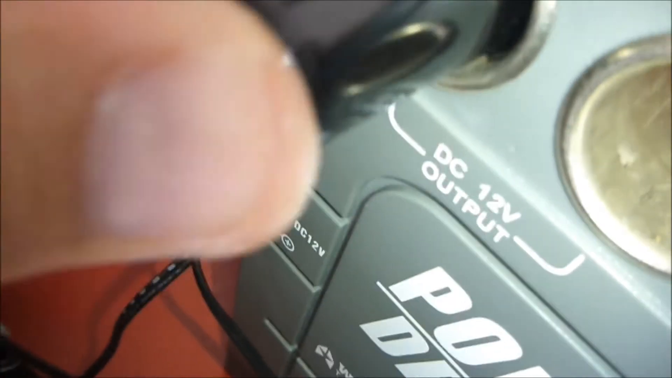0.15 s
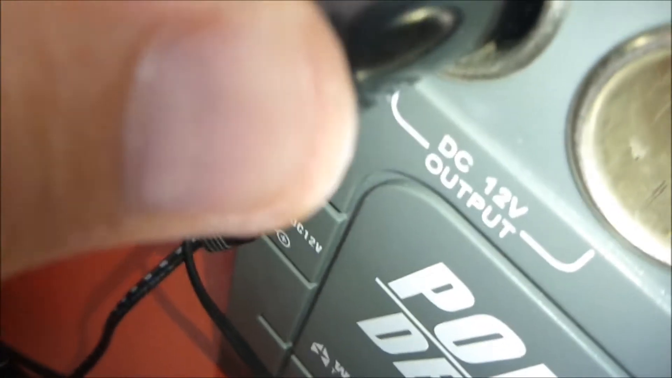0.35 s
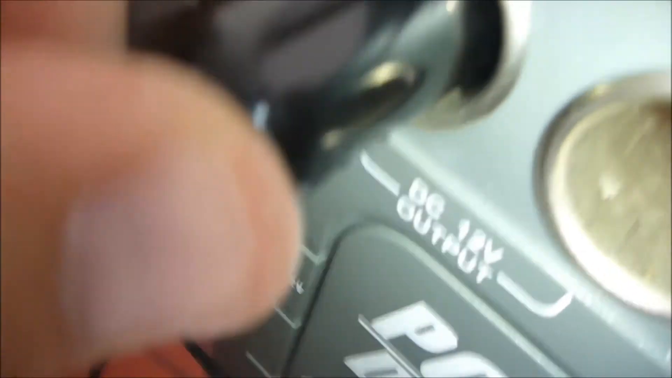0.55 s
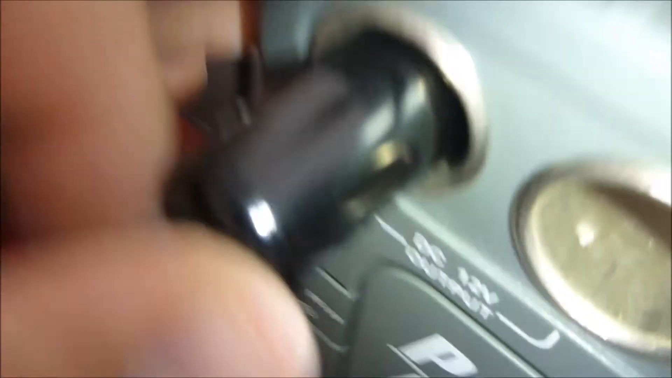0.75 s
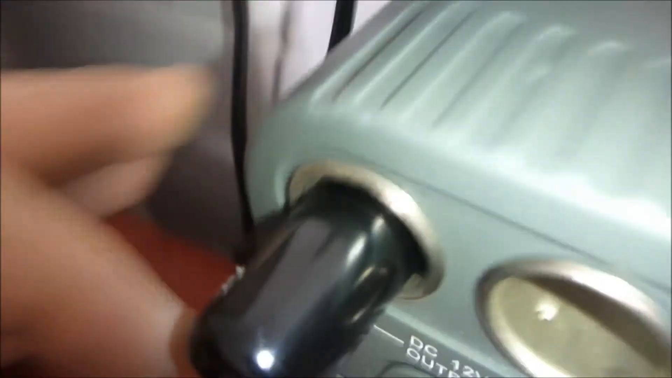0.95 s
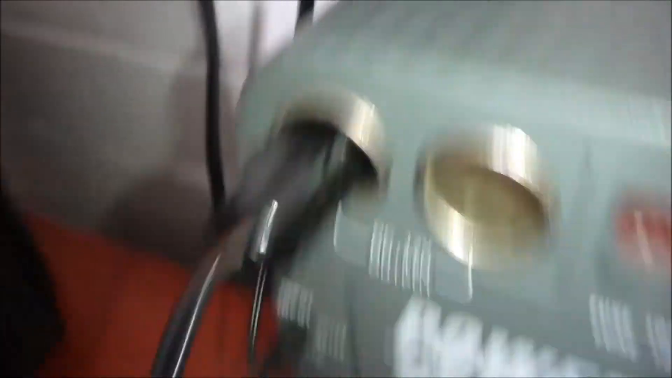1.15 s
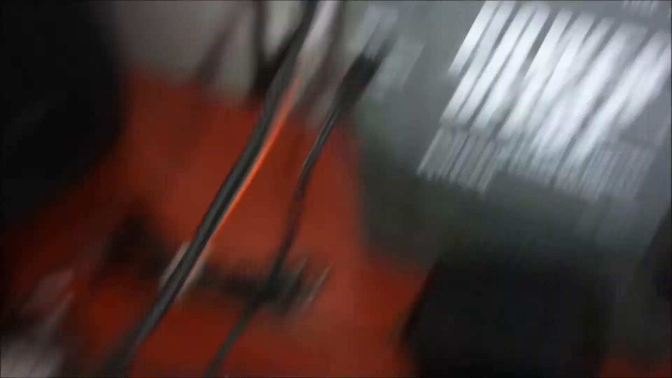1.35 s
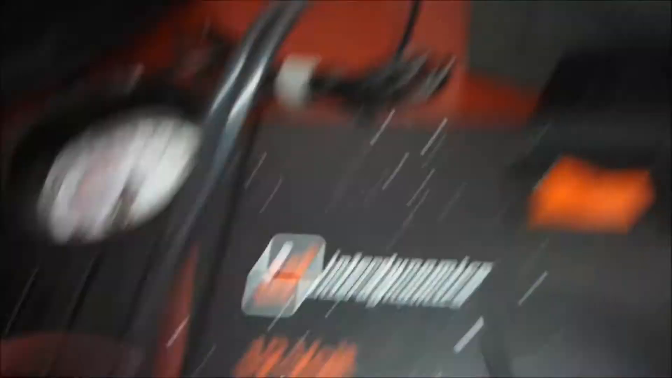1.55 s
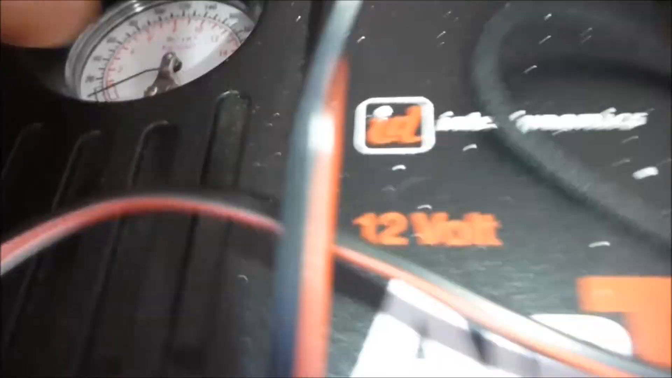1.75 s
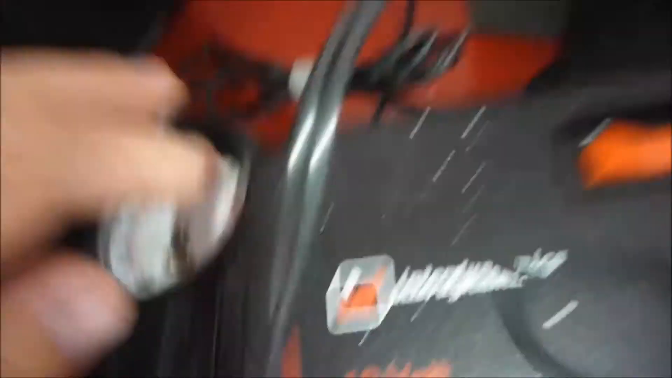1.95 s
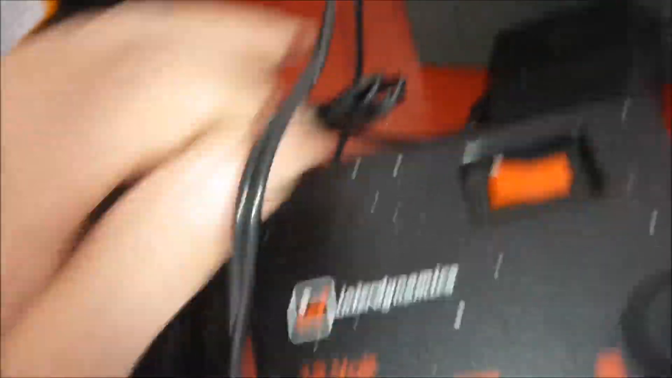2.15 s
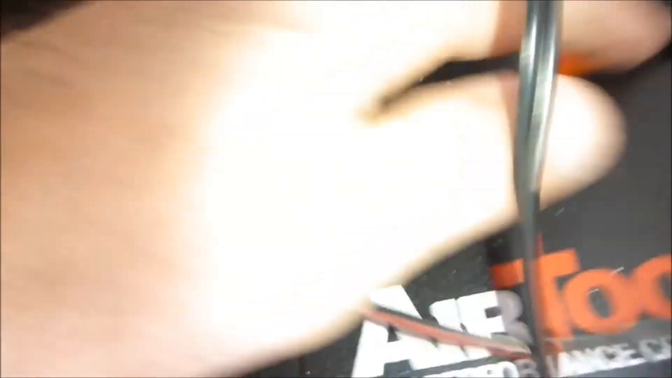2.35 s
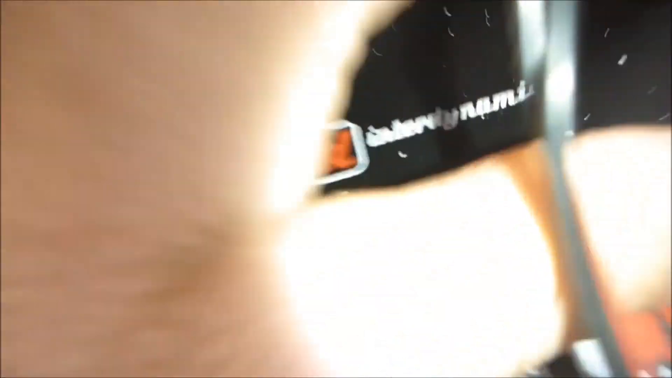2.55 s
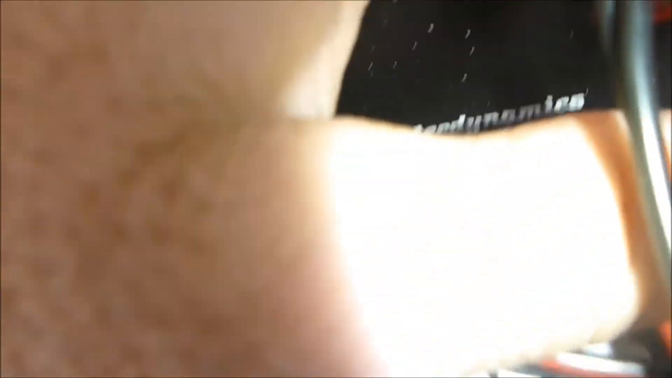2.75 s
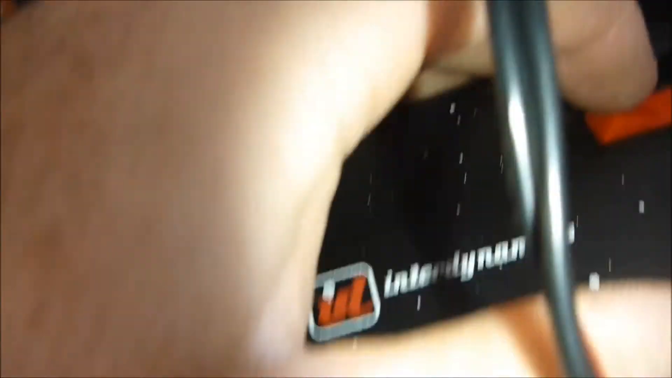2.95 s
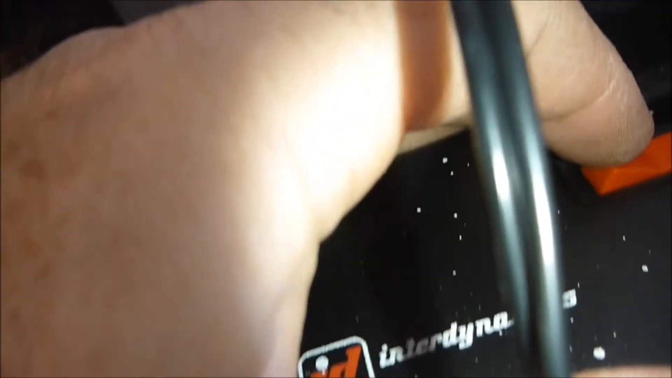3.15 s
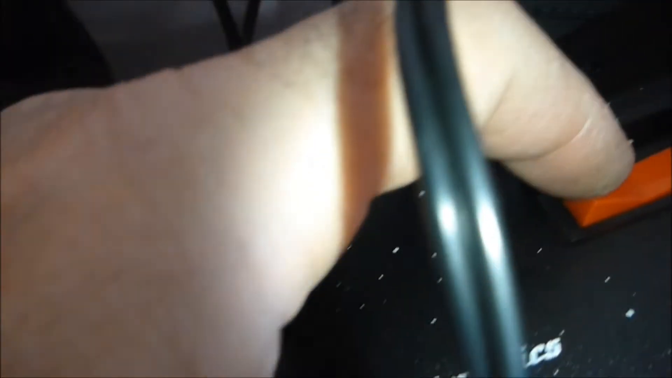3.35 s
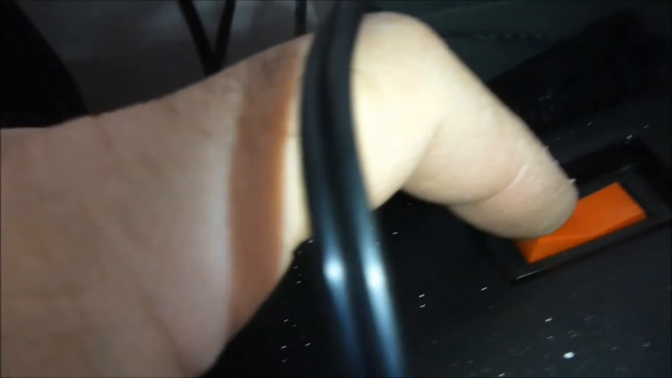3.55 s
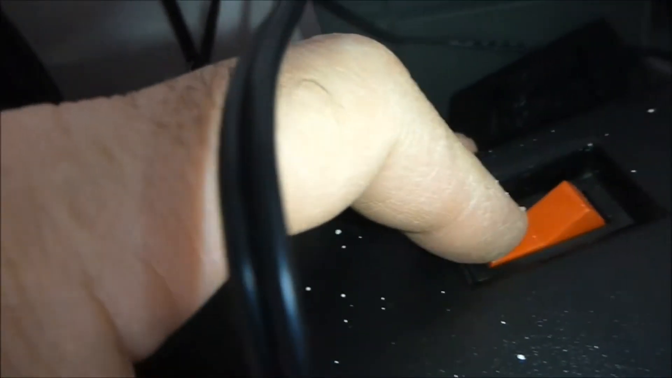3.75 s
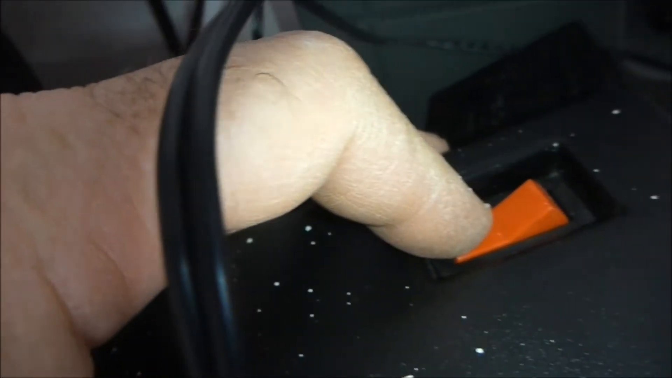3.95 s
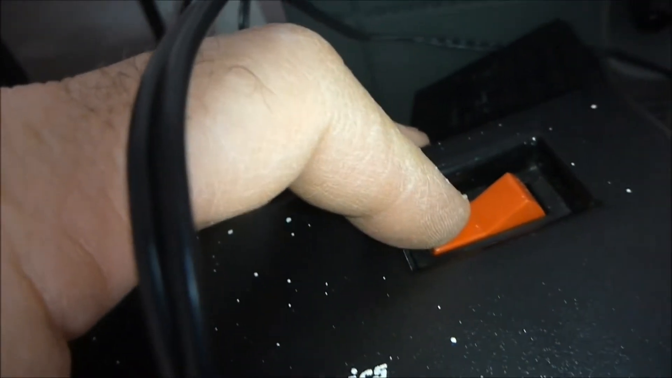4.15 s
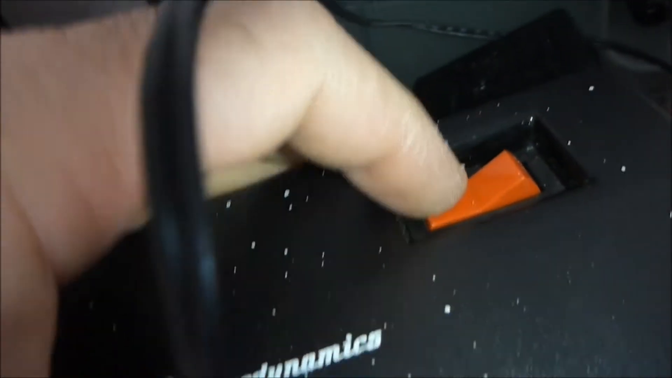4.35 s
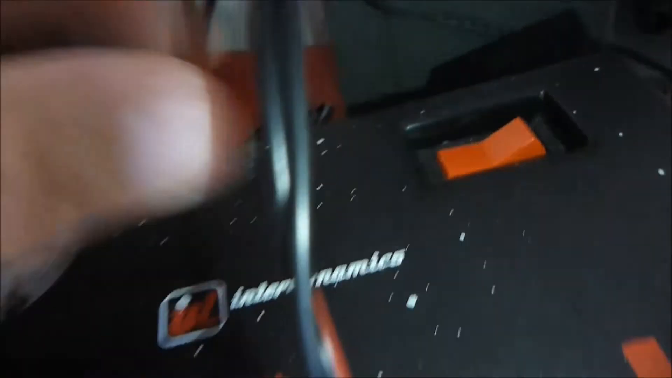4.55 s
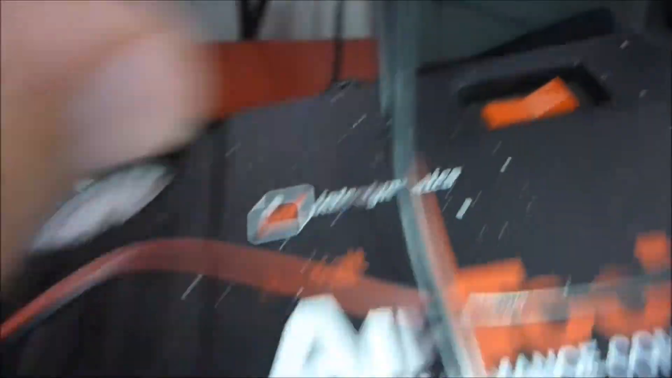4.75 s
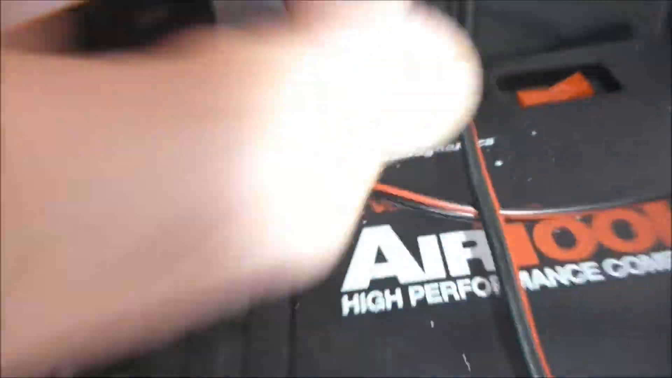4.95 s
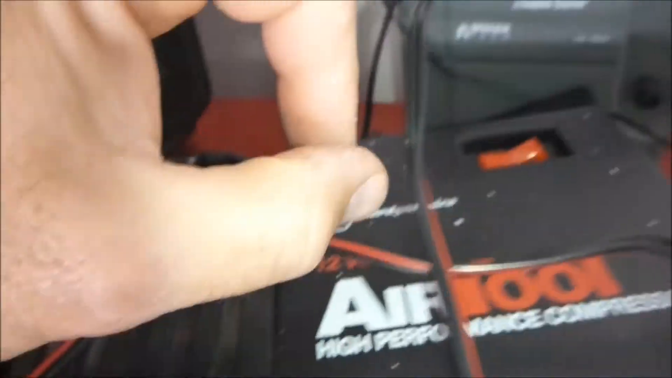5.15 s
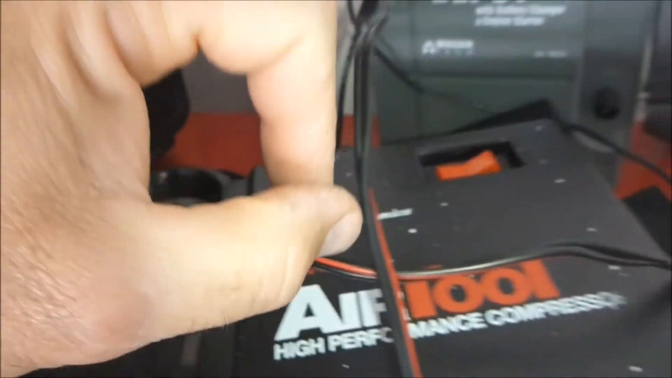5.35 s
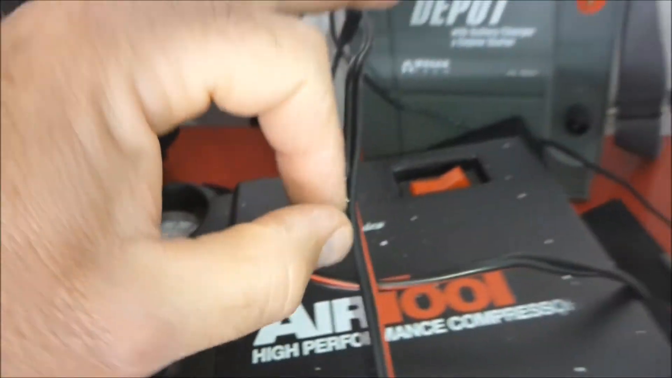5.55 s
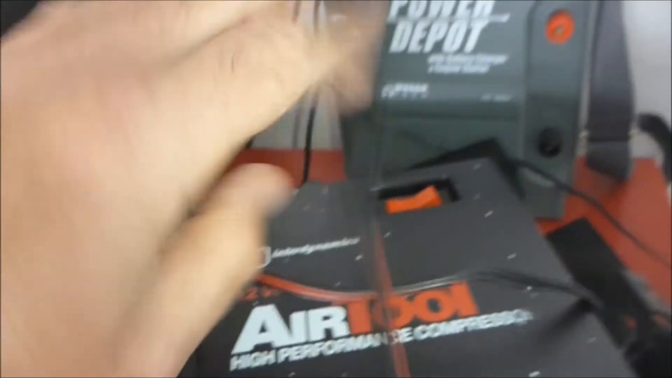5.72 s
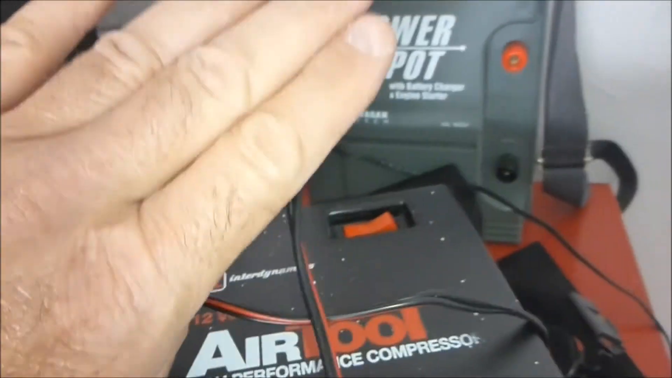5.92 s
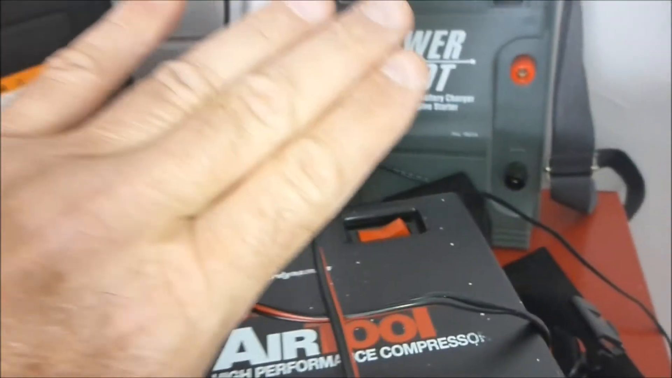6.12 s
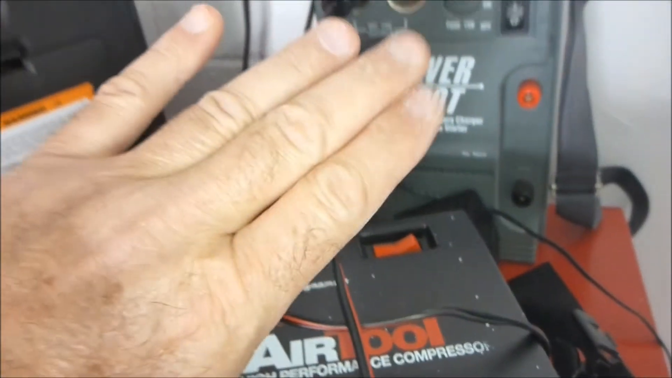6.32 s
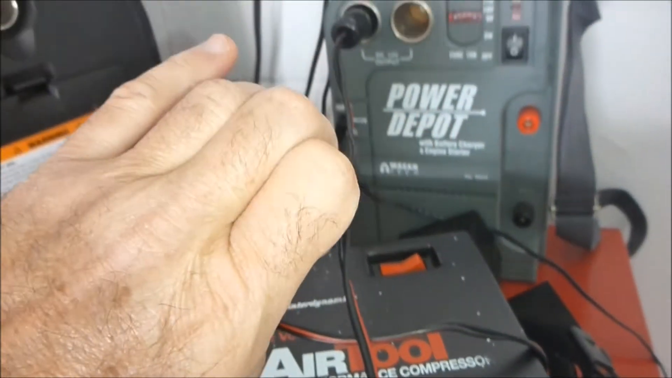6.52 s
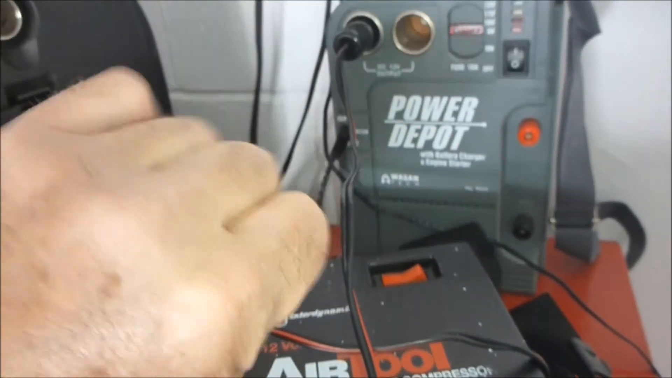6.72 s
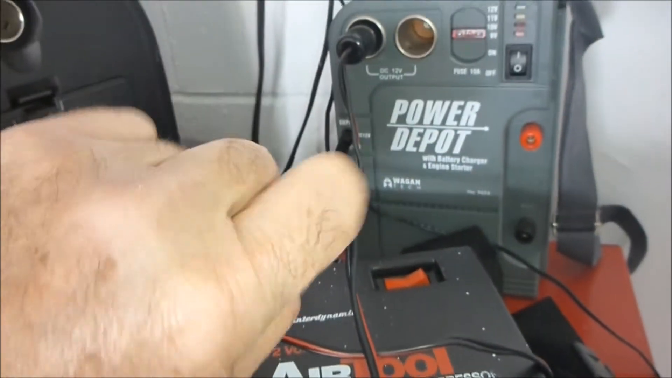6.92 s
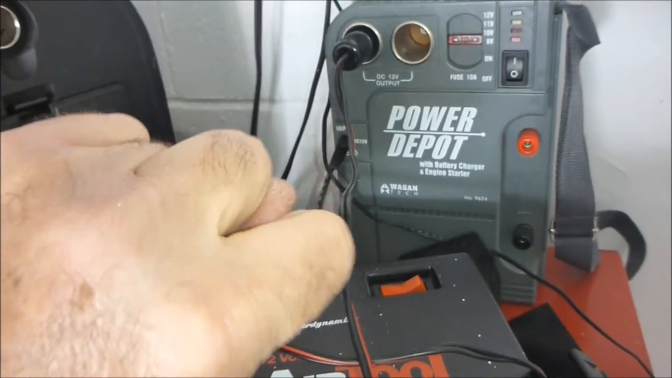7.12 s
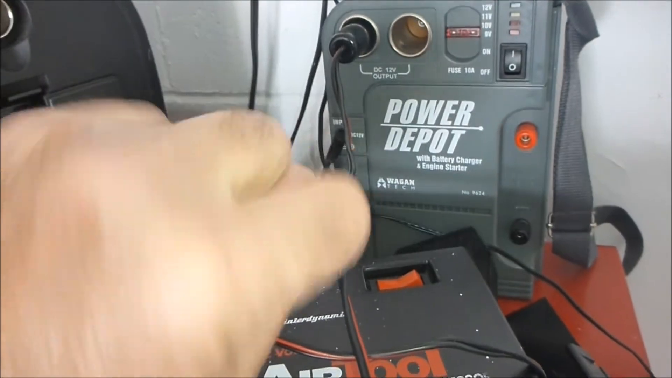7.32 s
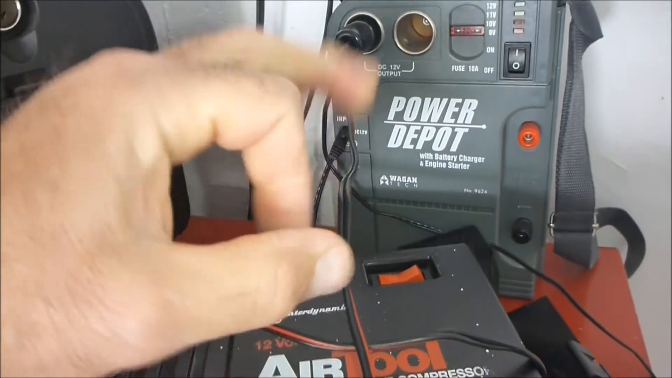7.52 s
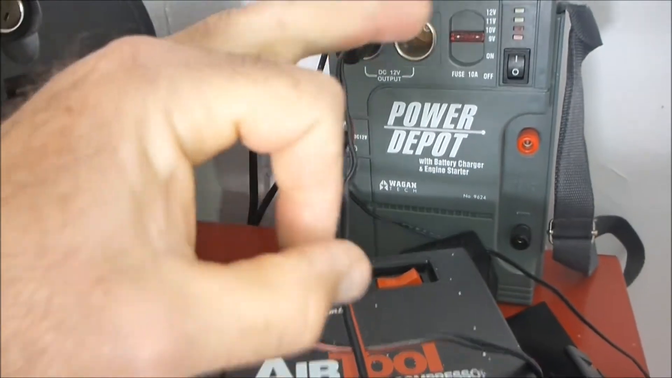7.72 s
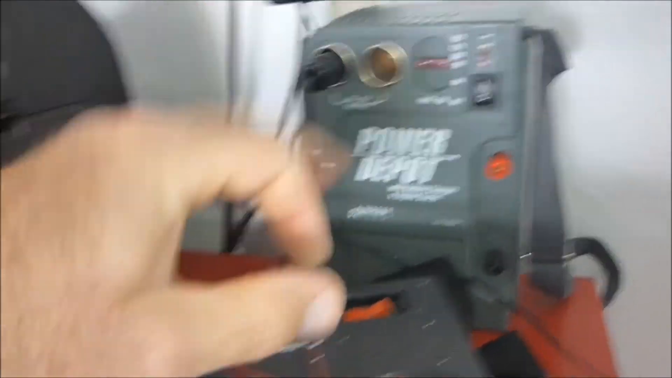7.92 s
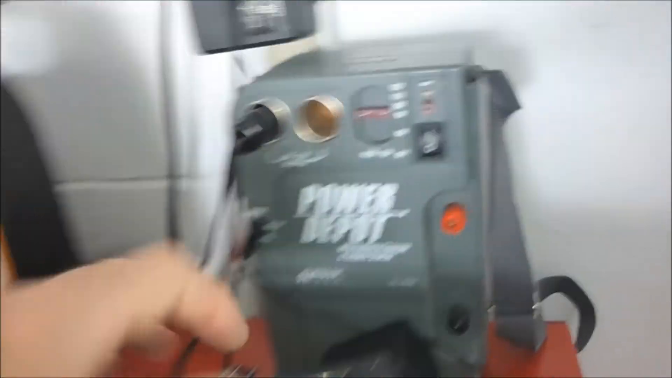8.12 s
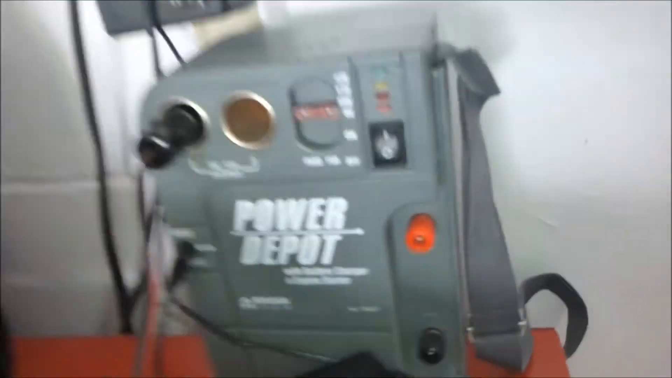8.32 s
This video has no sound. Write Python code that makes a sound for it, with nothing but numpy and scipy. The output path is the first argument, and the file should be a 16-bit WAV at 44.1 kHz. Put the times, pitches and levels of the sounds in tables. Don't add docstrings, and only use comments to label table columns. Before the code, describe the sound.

After quiet handling ticks and a hollow bump, a switch clacks and a little air compressor bursts into rapid chattering squeal with gear whine.

```python
import sys
import numpy as np
from scipy import signal
from scipy.fft import rfft, irfft, next_fast_len
from scipy.io import wavfile

SR = 44100
rng = np.random.default_rng(int(sys.argv[2]) if len(sys.argv) > 2 else 0)


def dump(signal):
    limited = np.clip(np.atleast_2d(signal).T, -1, 1)
    pcm = np.round(limited * 32767).astype(np.int16)
    wavfile.write(sys.argv[1], SR, pcm)


def rack_gain(trim_db):
    fader = np.asarray(trim_db, float)
    return 10 ** (fader / 20)


N = 369558
T = np.arange(N) / SR
FREE_PER_S = 34.548
GEAR = 55 / 12


def evened(x):
    return x / np.sqrt(np.mean(x ** 2) + 1e-20)


def curves(rows, t=T):
    s, *columns = np.transpose(rows)
    return [np.interp(t, s, c) for c in columns]


def add(mix, s, sound):
    part = mix[round(s * SR):][:len(sound)]
    part += sound[:len(part)]


def phase(hz):
    return 2 * np.pi * np.cumsum(hz) / SR


def coloured(x, points):
    hz, db = np.transpose(points)
    size = next_fast_len(len(x))
    log_hz = np.log(np.fft.rfftfreq(size, 1 / SR) + 1)
    gain = rack_gain(np.interp(log_hz, np.log(hz + 1), db))
    return evened(irfft(rfft(x, size) * gain, size)[:len(x)])


def ring(x, modes):
    total = 0
    for hz, width, db in modes:
        total = total + rack_gain(db) * signal.lfilter(*signal.iirpeak(hz, hz / width, SR), x)
    return evened(total)


def wander(hz):
    return evened(signal.lfilter(*signal.butter(2, hz, fs=SR), rng.standard_normal(N)))


def gate(share, start, rise, fall, rest_db):
    u = (share - start) % 1
    return evened(rack_gain(rest_db) + (1 - np.exp(-u / rise)) * np.exp(-(u / fall) ** 2))


def compressor():
    turns = crank()
    share = turns % 1
    slow = np.clip(1 - np.gradient(turns) * SR / FREE_PER_S, 0, 1) ** .5
    first_db, hz, second_db, case_db, air_db, high_db = running(turns)
    squeal, shrill = seal(turns, hz, second_db)
    shake = shaking(share)
    puff = valves(share, slow)
    thick_walls = signal.butter(6, 6300, fs=SR, output="sos")
    case = signal.sosfilt(thick_walls, rattle(shake, share))
    air = signal.sosfilt(thick_walls, outlet_air(shake, turns) * puff)

    out = rack_gain(first_db) * pipe(squeal) + rack_gain(high_db) * leak(shrill, share, slow)
    out += head_cover(shake, puff)
    out *= np.clip((T - 3.77) / 0.023, 0, 1)
    slow_case_db = -4 * slow
    start = np.clip((T - 3.765) / 0.062, 0, 1)
    out += (rack_gain(case_db + slow_case_db) * case + rack_gain(air_db) * air) * start
    out += catches() + slips()
    small_case = signal.butter(4, 410, "high", fs=SR, output="sos")
    return signal.sosfilt(small_case, out) + rotor(turns)


def crank():
    switch_on_s, first_stroke_s, first_turn = 3.7, 3.781, .0193
    short_per_s, wind_up_s, sag_per_s2 = 24.484, .29866, .13964
    t = np.maximum(T, switch_on_s) - first_stroke_s
    lag = short_per_s * wind_up_s * (1 - np.exp(-t / wind_up_s))
    return first_turn + FREE_PER_S * t - lag - sag_per_s2 * t ** 2 / 2


def running(turns):
    # t/s, first slip level/dB, second slip level/dB against it
    grip_curve = [(3.76, -30, -9), (3.945, -29.5, -25), (3.958, -10, -27), (4.02, -14, -12),
                  (4.1, -14, -29.5), (4.3, -15, -25), (4.4, -16.5, -9), (4.72, -16.5, -13), (5.4, -20.5, 0),
                  (5.9, -19.5, -1.5), (6.5, -23.5, 5.5), (7.1, -22.5, 0.5), (7.6, -22.5, 1),
                  (8.0, -23, 1.5), (8.12, -20.5, -1), (8.18, -18.5, -2), (8.38, -14.5, -3)]
    first_db, second_db = curves(grip_curve)
    since = np.maximum(T - 3.76, 0)
    lurch = np.exp(-((T - 3.835) / 0.018) ** 2)
    speed = np.clip(np.gradient(turns) * SR / FREE_PER_S, .05, 1)

    squeal_hz, cold_hz, settle_hz, settle_s = 964.4, 74.4, 59.2, 0.29
    hz = squeal_hz + cold_hz * (1 - np.tanh((T - 4.06) / 0.008)) / 2
    hz += settle_hz * np.exp(-since / settle_s)
    hz += 0.5 * np.maximum(second_db, 0)

    case_db = -24 - 0.27 * since + 2.5 * lurch
    air_db = -29.5 + 76 * np.log10(speed)
    air_db += 3 * np.exp(-((T - 5.08) / 0.44) ** 2)
    high_db = -34.5 - 2.5 * (1 - np.tanh((T - 4.86) / 0.16)) / 2 + 2 * lurch
    return first_db, hz, second_db, case_db, air_db, high_db


def seal(turns, hz, second_db):
    # multiple, level/dB
    overtones = [(2, -11.5), (4, -33), (5, -18), (6, -71)]
    u, stroke = (turns + .085) % 1, (turns + 2.085).astype(int)
    luck = rng.standard_normal((stroke.max() + 1, 3))[stroke].T
    after = np.maximum(u - .245, 0)
    sag = np.where(after > 0, 0.069 * after - .02, 0.192 * u - .03)
    cycles = np.cumsum(hz * (1 - sag + .004 * luck[0] + .008 * wander(250))) / SR
    new_stroke = np.diff(stroke, prepend=-1) > 0
    restart = np.maximum.accumulate(cycles * new_stroke)
    angle = 2 * np.pi * (cycles - restart + .05 * luck[1])

    first = (1 - np.exp(-(u / 0.032) ** 2)) * np.exp(-(u / 0.2) ** 1.8)
    second = (1 - np.exp(-(after / .05) ** 2)) * np.exp(-(after / .17) ** 1.5)
    grip = evened(first) + rack_gain(second_db) * evened(second)
    grip *= rack_gain(.7 * luck[2] + 1.2 * wander(120))
    warm = rack_gain(-3.5 * (1 + np.tanh((T - 4.47) / 0.054)) / 2)
    tone = np.sin(angle) + warm * sum(rack_gain(db) * np.sin(k * angle) for k, db in overtones)
    shrill = evened(sum(np.sin(k * angle + k * k) for k in range(6, 16)))
    return grip * tone, shrill


def pipe(squeal):
    # f/Hz, width/Hz, level/dB
    pipe_modes = [(954.4, 67, 4.5), (1095.5, 42, 0), (2022, 73, 7.5), (4000, 170, 16.5), (5350, 3400, -24)]
    return 1.044 * evened(0.03 * squeal + ring(squeal, pipe_modes))


def leak(shrill, share, slow):
    # f/Hz, width/Hz, level/dB
    thin_parts = [(6200, 560, -4), (7440, 6200, -0.5), (8550, 1500, -1.5), (9780, 910, 5),
                  (10340, 440, -1.5), (11300, 340, 9.5), (12600, 560, 8.5), (13200, 710, 3.5),
                  (14400, 700, 4), (15600, 500, -10)]
    hiss = coloured(rng.standard_normal(N), [(5500, -52), (6500, 2.5), (16000, -7.5)])
    blow_by = gate(share, -.03, .12 - .1 * slow, .38 - .15 * slow, -6.5 - 11 * slow)
    purity = .5 + 1.6 * slow ** 2 * evened(blow_by ** 2) / 2
    return ring((purity * shrill + .75 * hiss) * blow_by, thin_parts)


def shaking(share):
    habit = np.interp(share * 1200, np.arange(1201), rng.standard_normal(1201))
    habit = evened(signal.lfilter(*signal.butter(2, 1000, "high", fs=SR), habit))
    return .7 * habit + rng.standard_normal(N) * rack_gain(1.5 * wander(300))


def rattle(shake, share):
    # f/Hz, level/dB per Hz
    case_band = [(380, -79.5), (460, -20), (700, -10), (960, -2.5), (1370, -16.5), (1700, -13.5),
                 (2000, -25), (2820, -17), (3850, -25), (4430, -32.5), (5520, -22), (6300, -28)]
    # f/Hz, width/Hz, level/dB
    case_modes = [(548, 27, 3.5), (612, 68, 1), (910, 60, 0), (1056, 64, 6), (2000, 102, -6.5)]
    body = 1.22 * ring(shake, case_modes) + 1.28 * coloured(shake, case_band + [(7500, -60)])
    return body * gate(share, 0.355, 0.22, 0.18, -1.1)


def valves(share, slow):
    outlet = gate(share, .4, .08, .24, -9 - 11 * slow / 2)
    inlet = gate(share, -.1, .08, .2, -30)
    return evened(outlet + rack_gain(-9.0) * inlet)


def outlet_air(shake, turns):
    # f/Hz, width/Hz, level/dB
    passages = [(1956, 220, 10), (2320, 1800, -4.5), (3110, 90, 11.5), (3400, 120, 4), (4880, 220, -1)]
    # f/Hz, width/Hz, level/dB
    head_modes = [(3130, 70, -2), (3350, 39, 12), (5200, 340, 4), (5550, 210, -9.5)]
    whine = gear_whine(turns)
    return ring(shake, passages) + whine + rack_gain(-7.5) * ring(whine, head_modes)


def gear_whine(turns):
    # multiple, level/dB
    mesh_orders = [(1, -8), (2, -4), (3, -10)]
    teeth = 55
    yielding = .003 * np.sin(2 * np.pi * (turns % 1)) + .0006 * wander(150)
    mesh = 2 * np.pi * teeth * (turns + yielding)
    return sum(rack_gain(db + 3 * wander(60)) * np.sin(k * mesh) for k, db in mesh_orders)


def head_cover(shake, puff):
    # t/s, length/s, f/Hz, level/dB
    cover_rings = [(4.4, 0.11, 3350, -36), (4.65, .08, 3320, -37), (4.68, 0.18, 3030, -29),
                   (4.88, 0.11, 3780, -33), (4.903, 0.051, 3400, -31), (5.075, 0.061, 3580, -33),
                   (5.28, 0.23, 3060, -33), (5.5, .35, 3900, -38), (4.25, .12, 4850, -47),
                   (5.1, .2, 5670, -42), (6.3, 0.31, 3890, -38), (7.4, 0.27, 3150, -47)]
    out = np.zeros(N)
    for s, length, hz, db in cover_rings:
        span = slice(int((s - 3 * length) * SR), int((s + 3 * length) * SR))
        swell = np.exp(-((T[span] - s) / length) ** 2)
        out[span] += rack_gain(db) * swell * ring(shake[span] * puff[span], [(hz, 45, 0)])
    return out


def catches():
    # t/s, length/s, f/Hz, level/dB, upper multiples level/dB
    releases = [(3.778, 0.021, 1110, -10, -31), (3.793, 0.015, 1100, -10, -34),
                (3.852, 0.026, 1079, -8.5, -36), (3.89, .015, 970, -9, -33),
                (3.913, 0.021, 1050, -7.5, -38), (3.77, 0.01, 1005, -21, -38)]
    out = np.zeros(N)
    for s, length, hz, db, upper_db in releases:
        u = np.linspace(0, 1, int(length * SR))
        a = phase(hz * (1 - 0.026 * u))
        upper = sum(np.sin(k * a) for k in range(4, 9))
        tone = np.sin(a) + rack_gain(-20) * np.sin(2 * a) + rack_gain(upper_db) * upper
        add(out, s, rack_gain(db) * 2.6 * (1 - np.exp(-(u / .15) ** 2)) * (1 - u ** 0.96) * tone)
    return out


def slips():
    # t/s, length/s, f/Hz, level/dB, octave level/dB
    returns = [(3.737, .026, 1275, -32.5, -15), (3.755, 0.038, 934, -25.5, -20),
               (3.775, 0.04, 548, -27.5, -30), (3.816, 0.05, 745, -21, -4), (3.93, 0.046, 1111, -20.5, -19),
               (3.983, 0.027, 1250, -19, -12), (4.032, 0.014, 1304, -22.5, 1),
               (4.083, 0.0117, 1300, -32, -2)]
    out = np.zeros(N)
    for s, length, hz, db, octave_db in returns:
        a = phase(hz * (1 + 0.045 * wander(200)[:int(length * SR)]))
        tone = np.sin(a) + rack_gain(octave_db) * np.sin(2 * a)
        add(out, s, rack_gain(db) * 2 * np.hanning(len(a)) ** 0.11 * tone)
    return out


def rotor(turns):
    # multiple, level/dB
    crank_orders = [(2, -87), (3, -104), (4, -54), (5, -88), (8, -41.5), (9, -45), (10, -51.5), (11, -50.5),
                    (13, -44.5), (16, -35), (32, -36.5), (36, -43.5)]
    # multiple, level/dB
    shaft_orders = [(2, -88), (3, -36.5), (4, -36), (12, -42)]
    # t/s, level/dB
    hum_curve = [(3.95, -62), (4.05, -45), (4.18, -36), (4.4, -43), (4.62, -39), (5.6, -49), (6.5, -50),
                 (8.2, -42)]
    speed = np.clip(np.gradient(turns) * SR / 34, 0, 1)
    cranking, shaft, angle = 0, 0, 2 * np.pi * GEAR * turns
    for k, db in crank_orders:
        cranking = cranking + rack_gain(db) * np.sin(2 * np.pi * (k * turns + rng.random()))
    for k, db in shaft_orders:
        shaft = shaft + rack_gain(db + 2.4 * wander(0.61)) * np.sin(k * angle)
    hum = rack_gain(curves(hum_curve)[0]) * np.sin(angle) * (T > 3.9)
    return np.sqrt(2) * (cranking * speed ** 5.4 + shaft * speed ** 1.8 + hum)


def rocker_switch():
    # t/s, ring level/dB, crack level/dB
    rocker = [
        (3.597, -27, -21),
        (3.657, -4.5, -23),
    ]
    # t/s, ring level/dB, crack level/dB
    contact = [
        (3.6932, -6.5, 1),
    ]
    return clicks(rocker, 700, .055, -5, edge_hz=1200) + clicks(contact, 2220, .068, -5)


def plugging():
    # t/s of the peak, rise/s, fall/s, level/dB, fizz level/dB against it
    pushes = [
        (.046, 0.045, 0.016, -23, -31),
        (.1, 0.024, 0.021, -27.5, -21),
        (.134, 0.032, 0.021, -24.5, -30),
        (.22, 0.065, 0.027, -39.5, -25),
    ]
    # f/Hz, width/Hz, level/dB
    socket_modes = [(261, 50, 6.5), (517, 110, -1), (768, 90, -2), (1570, 250, -5.5), (2300, 300, -14)]
    # t/s, ring level/dB, crack level/dB
    plug_ticks = [(.004, -22, -38), (.009, -30, -34), (.024, -21, -32), (.036, -7, -15), (.0465, -23, -12),
                  (.055, -27, -30), (.09, -19, -22), (.115, -15, -29), (.126, -20, -33), (.14, -12.5, -2),
                  (.153, -26, -33), (.192, -33, -30), (.405, -30, -22.5), (.68, -36, -32)]
    return scrape(pushes, socket_modes) + clicks(plug_ticks, 670, 0.034, 1)


def cable():
    brushes = [
        (1.37, 0.022, 0.07, -53, 9),
        (1.45, 0.056, 0.35, -36, -8.5),
        (1.66, 0.17, 0.014, -44, -33),
    ]
    # f/Hz, width/Hz, level/dB
    cloth_modes = [(563, 63, 23), (870, 150, 19), (1640, 255, -20)]
    # t/s, ring level/dB, crack level/dB
    cable_ticks = [(.8, -26, -27.5), (1.431, -32, -42), (2.6, -42, -25), (2.622, -23.5, -18.5),
                   (2.719, -28, -26), (2.761, -28, -30.5), (3.004, -21, -19), (3.039, -27.5, -20.5)]
    return scrape(brushes, cloth_modes) + clicks(cable_ticks, 625, 0.11, -15)


def moved_case():
    drags = [
        (2.208, 0.021, 0.038, -24.5, -11),
        (2.25, 0.07, 0.021, -14, -12),
        (2.286, .004, .01, -25, -40),
        (2.308, 0.02, 0.016, -17, -45),
        (2.342, 0.032, .015, -27, -35),
    ]
    # f/Hz, width/Hz, level/dB
    table_modes = [(723, 42, 25), (756, 68, 24), (1190, 55, 9), (1690, 59, -10), (2300, 110, -17),
                   (3100, 140, -8)]
    # t/s, ring level/dB, crack level/dB
    case_bumps = [(2.214, -28, -21), (2.232, -23, -48), (2.282, -25, -50), (2.304, -33, -49),
                  (2.371, -26, -32), (2.488, -24, -36)]
    blow = knock(2.228, hz=690, db=-1, t60=.06)
    answer = knock(2.394, hz=210, db=-24, t60=.05)
    return scrape(drags, table_modes) + clicks(case_bumps, 870, 0.086, -16) + blow + answer


def scrape(strokes, modes):
    jerks = rng.standard_normal(N) * rack_gain(2.8 * wander(200))
    body = ring(jerks, modes)
    fizz = coloured(jerks, [(800, -17), (1500, 14), (2600, 10), (6000, -24), (15000, -43)])
    out = np.zeros(N)
    for s, rise, fall, db, fizz_db in strokes:
        pressing = np.clip(1 + (T - s) / rise, 0, 1) ** 2
        easing = np.exp(-np.maximum(T - s, 0) / fall)
        out += rack_gain(db) * np.where(T < s, pressing, easing) * (body + rack_gain(fizz_db) * fizz)
    return out


def clicks(rows, hz, t60, top_db, edge_hz=2200):
    out, t = np.zeros(N), T[:6000]
    fade = rack_gain(-60 * t / max(t60, .01)) * np.minimum(t / 0.00071, 1)
    snap = rack_gain(-280 * t / max(t60, .01)) * np.clip(t / 0.00029 - 1.5, 0, 1)
    body_band = [(100, -62), (260, 5.5), (edge_hz, 0.5), (1.7 * edge_hz, -46)]
    crack_band = [(60, -25), (300, -1), (1500, 3.1), (2600, 6.0), (5000, -0.5),
                  (8000, top_db), (14000, top_db), (16000, top_db - 6)]
    for s, ring_db, crack_db in rows:
        noise = rng.standard_normal((2, len(t)))
        body = .5 * np.sin(2 * np.pi * hz * t) * fade + .5 * coloured(noise[0], body_band)
        crack = coloured(noise[1], crack_band) * (snap + 0.057 * fade ** 0.36)
        add(out, s - .001, rack_gain(ring_db) * body * fade + rack_gain(crack_db) * crack)
    return out


def knock(s, hz, db, t60):
    out, t = np.zeros(N), T[:5000]
    swell = 1 - np.exp(-(t / 0.0057) ** 2)
    add(out, s, rack_gain(db - 60 * t / t60) * swell * 2 * np.sin(2 * np.pi * hz * t))
    return out


def birds():
    # t/s, from f/Hz, level/dB
    falling = [(.287, 3500, -63), (.375, 3000, -61), (.478, 4300, -63), (.95, 4050, -64), (.49, 4150, -66),
               (.965, 4100, -62), (1.0, 4500, -63), (1.083, 3810, -56), (1.16, 4200, -61),
               (1.77, 4000, -65), (3.21, 4700, -64), (1.28, 3800, -58), (1.375, 3900, -57),
               (1.638, 4300, -53), (1.697, 4050, -52.5), (1.747, 3860, -73), (1.878, 3850, -64),
               (1.93, 3750, -60), (2.163, 3730, -55), (2.394, 4020, -58), (2.868, 3600, -57),
               (3.237, 4000, -59), (3.357, 3580, -55), (3.525, 3900, -57)]
    # t/s, from f/Hz, level/dB
    rising = [(.516, 4000, -63), (.692, 3780, -61), (.804, 3640, -54), (.95, 4350, -59), (1.117, 3580, -55),
              (.55, 4300, -66), (.92, 4300, -60), (1.14, 3870, -62), (1.175, 3750, -66), (1.64, 3800, -57),
              (1.245, 3550, -59), (1.27, 4060, -64), (1.512, 4250, -61), (2.742, 3900, -56),
              (3.38, 3400, -65)]
    # t/s, f/Hz, level/dB
    steady = [(.57, 4670, -69), (.62, 4250, -74), (.94, 4000, -62), (.95, 4750, -64), (1.615, 4570, -54),
              (1.645, 3850, -58), (1.66, 4560, -58), (1.745, 3280, -62), (1.885, 3310, -60),
              (2.045, 3300, -58), (3.17, 4995, -63), (3.2, 4920, -65)]
    # t/s, from f/Hz, rise share, level/dB
    arched = [(0.339, 3090, .07, -57), (.83, 3640, .14, -57), (1.125, 3450, 0.12, -58),
              (1.179, 3600, .1, -65), (1.265, 3750, 0.19, -61), (1.733, 3600, .12, -61),
              (1.92, 3600, .08, -61)]
    out, flutter = np.zeros(N), wander(63)
    for rows, length, glide in (falling, 0.0278, -0.14), (rising, 0.032, 0.093), (steady, 0.033, 0):
        count = int(length * SR)
        for s, from_hz, db in rows:
            hz = from_hz * np.linspace(1, 1 + glide, count) * (1 + .007 * flutter[int(s * SR):][:count])
            add(out, s, rack_gain(db + 14.0) * np.hanning(count) * np.sin(phase(hz)))
    arch = np.sin(np.linspace(0, np.pi, int(.032 * SR)))
    for s, from_hz, share, db in arched:
        add(out, s, rack_gain(db + 13.5) * arch ** .5 * np.sin(phase(from_hz * (1 + share * arch))))

    s, length, hz, db, rate = .58, .56, 2130, -57, 32
    t = T[:int(length * SR)]
    notes = np.sin(np.pi * rate * t + .5 * flutter[:len(t)]) ** 4 * np.hanning(len(t)) ** 0.82
    add(out, s, rack_gain(db + 16) * notes * np.sin(phase(hz * (1 + .02 * flutter[-len(t):]))))
    echoes = rng.standard_normal(9000) * rack_gain(-60 * T[:9000] / .25)
    return out + rack_gain(-5) * signal.oaconvolve(out, echoes / np.linalg.norm(echoes))[:N]


def room():
    # f/Hz, level/dB per Hz
    room_band = [(12, -62), (20, -37), (65, -4), (172, -1.5), (399, -3), (485, -0.5), (849, -4),
                 (1190, -7.5), (1910, -11), (2140, -10.5), (2910, -12), (3740, -10), (5680, -14.5),
                 (16000, -20)]
    # t/s, level/dB
    drift = [(0, 20), (.3, 7.5), (.6, 12.5), (1.2, 10), (1.7, 12), (1.9, 12), (2.4, 15.5), (2.9, 11.5),
             (3.7, 13.5)]
    # t/s, length/s, level/dB above the hiss
    rustles = [(0.247, 0.081, 3), (.85, 0.23, 9.5), (1.42, 0.15, 12), (2.598, 0.39, 6), (3.5, 0.83, 3.5)]
    rustle_db = sum(db * np.exp(-((T - s) / length) ** 2) for s, length, db in rustles)
    noise = rack_gain(-48.5 + 1.0 * wander(29)) * coloured(rng.standard_normal(N), room_band)
    low = signal.lfilter(*signal.butter(1, 1300, fs=SR), noise)
    return rack_gain(curves(drift)[0]) * low + rack_gain(-8 + rustle_db) * (noise - low)


def scene():
    hands = plugging() + cable() + moved_case()
    return (compressor() + rocker_switch() + hands + birds() + room())[None]


def roll_off(x):
    return signal.sosfilt(signal.butter(12, 16510, fs=SR, output="sos"), x)


def record(dry):
    # f/Hz, width/Hz
    dips = [(2890, 100), (7845, 60), (11680, 650)]
    x = signal.lfilter(*signal.butter(2, 35, "high", fs=SR), np.clip(dry, -1, 1))
    for hz, width in dips:
        x = signal.lfilter(*signal.iirnotch(hz, hz / width, SR), x)
    step_hz = [0, 15600, 15800, 16100, 16500, SR / 2]
    step_db = [0, 0, -17, -18, -30, -36]
    top = signal.firwin2(511, step_hz, rack_gain(step_db), fs=SR)
    return roll_off(signal.oaconvolve(x, top[None], "same"))


dry = scene()
out = record(dry)
dump(out)
```